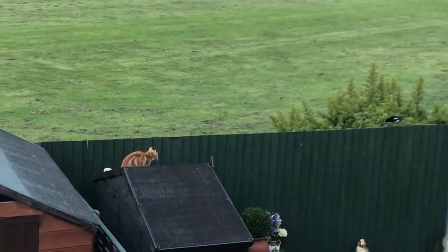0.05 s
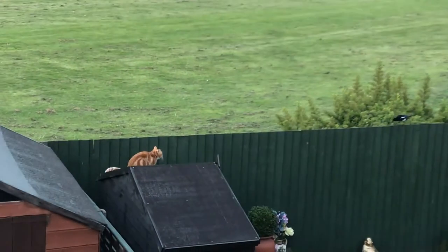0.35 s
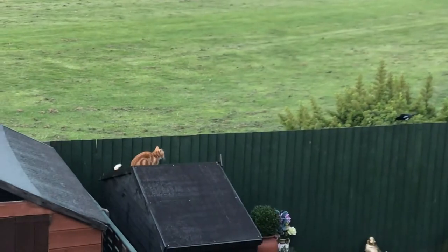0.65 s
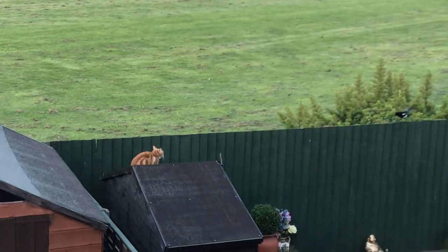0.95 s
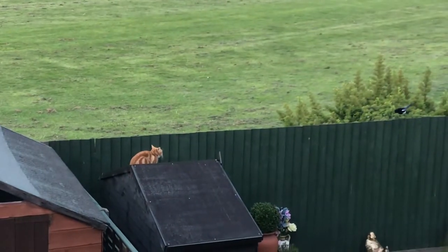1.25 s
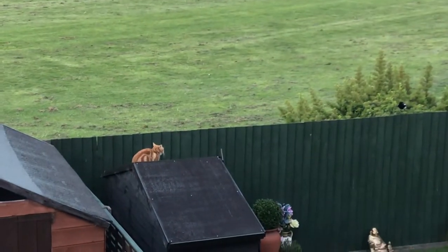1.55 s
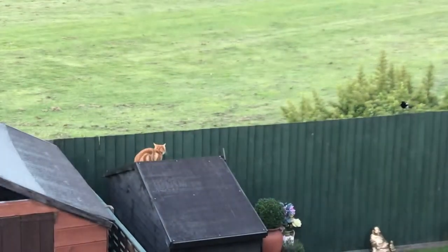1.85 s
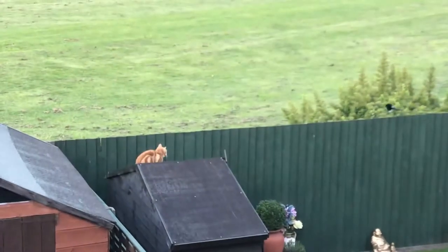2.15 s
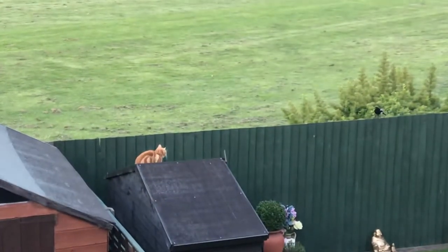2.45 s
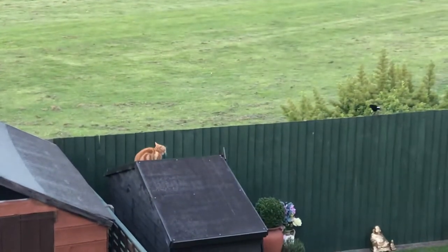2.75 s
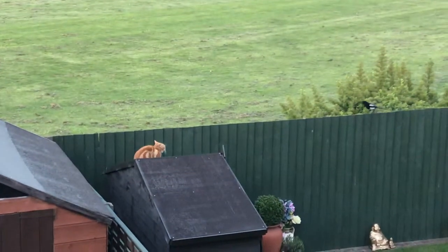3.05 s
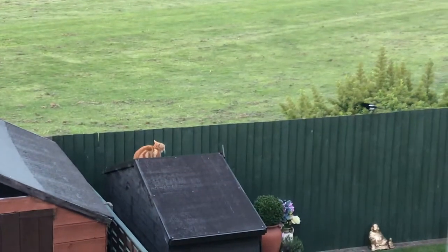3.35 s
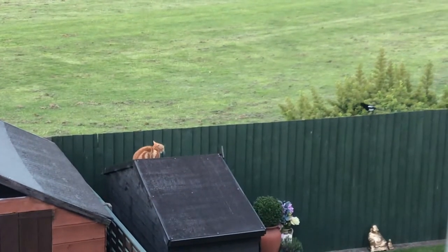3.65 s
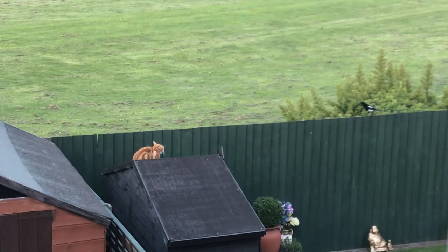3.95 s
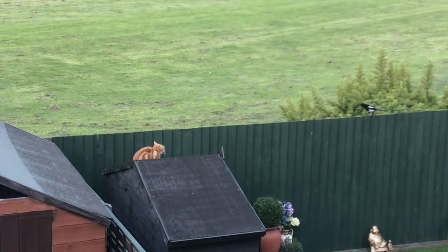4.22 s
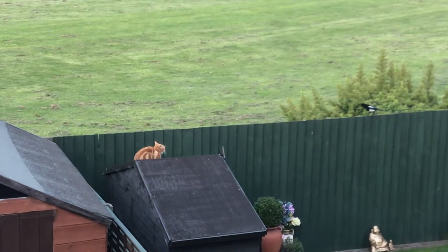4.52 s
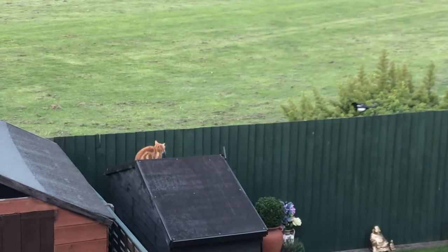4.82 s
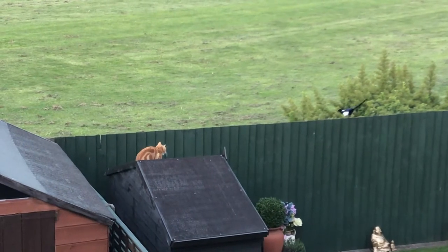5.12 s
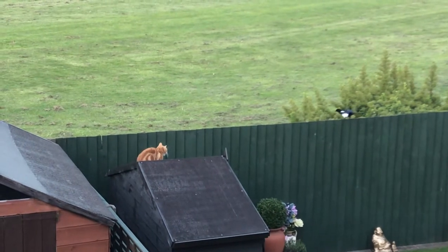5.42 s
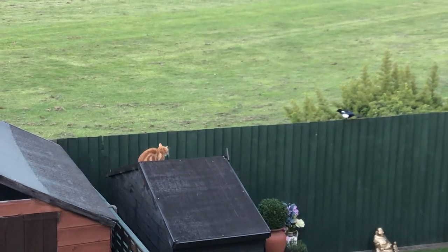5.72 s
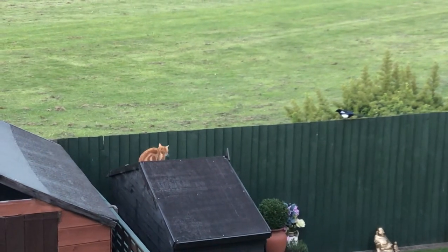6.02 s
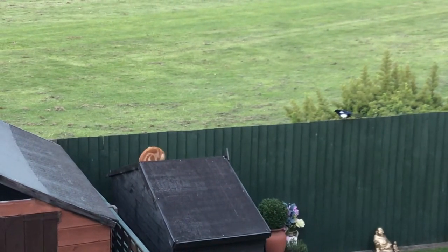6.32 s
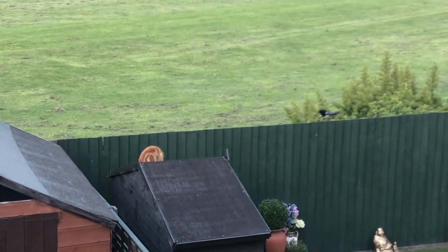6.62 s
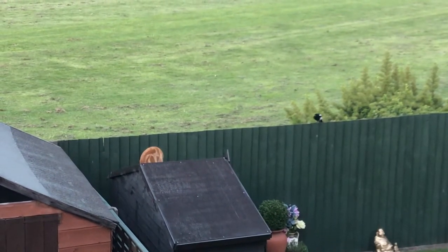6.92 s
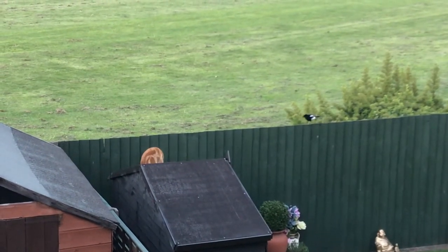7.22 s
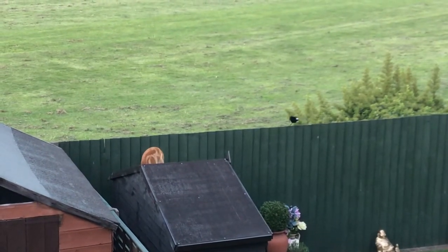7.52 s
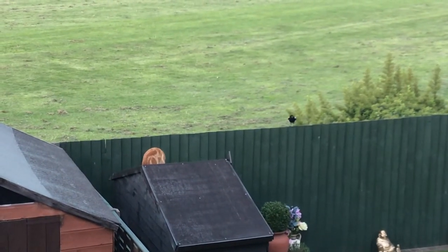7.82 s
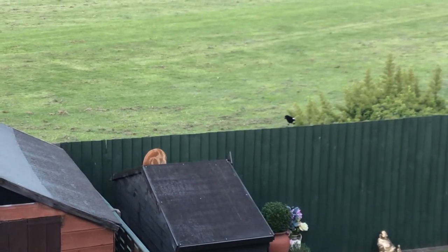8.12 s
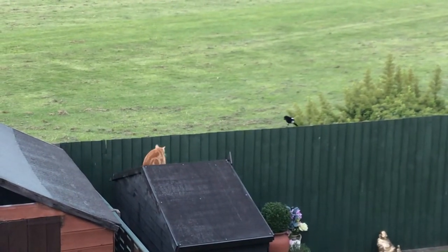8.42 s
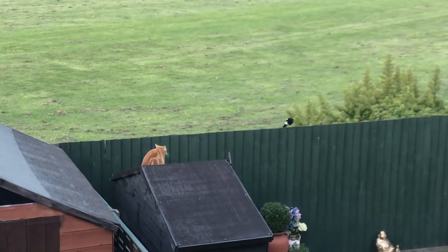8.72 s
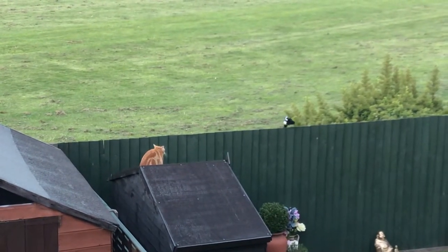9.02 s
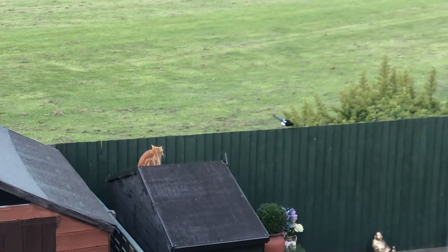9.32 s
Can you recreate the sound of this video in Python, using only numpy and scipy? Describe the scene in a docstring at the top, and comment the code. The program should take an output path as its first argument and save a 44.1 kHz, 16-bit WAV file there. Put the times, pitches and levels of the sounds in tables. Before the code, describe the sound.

A magpie gives two harsh, clacking rattles outdoors, while faint small birds twitter and whistle over a low hum of distant traffic.

```python
'''A magpie scolds a cat

A magpie on a garden fence gives two harsh rattles, heard from an upstairs window. Each clack is
a rasp of uneven pulses through a beak that snaps open; fence, sheds and houses throw it back.
Small birds twitter and a songbird whistles far off, over the hum of traffic where one engine
speeds up. Now and then there is a faint rustle or a soft knock.'''
import sys
import numpy as np
from scipy import signal
from scipy.fft import rfft, irfft, next_fast_len
from scipy.io import wavfile

SR = 44100
rng = np.random.default_rng(int(sys.argv[2]) if len(sys.argv) > 2 else 0)


def wav_out(sig):
    """Save sig, one row per channel (or a flat mono array), as 16-bit PCM at SR to the path in sys.argv[1]."""
    wavfile.write(sys.argv[1], SR, np.round(np.clip(np.atleast_2d(sig).T, -1, 1) * 32767).astype(np.int16))


N = 412794
TIME = np.arange(N) / SR


def amp(db):
    """Turns decibels into a number to multiply by."""
    return 10 ** (np.asarray(db) / 20)


def unit(x):
    """Scales a sound to an average power of 1."""
    return x / np.sqrt(np.mean(x ** 2) + 1e-20)


def read(points, hz):
    """Looks up a value between a table's rows, on a log scale of frequency."""
    row_hz, value = np.transpose(points)
    return np.interp(np.log(hz + 1), np.log(row_hz + 1), value)


def add(mix, start, sound):
    """Mixes a sound in at a start time in seconds."""
    part = mix[max(round(start * SR), 0):][:len(sound)]
    part += sound[:len(part)]


def wander(count, hz):
    """A smooth random drift, mostly slower than hz."""
    size = next_fast_len(count + SR // 8)
    rolloff = 1 + (np.fft.rfftfreq(size, 1 / SR) / hz) ** 4
    return unit(irfft(rfft(rng.standard_normal(size)) / rolloff, size))[:count]


def colour(x, points, size=4096):
    """Shapes a sound's bass and treble to follow a table, with no ringing ahead of the sound."""
    log_gain = np.log(amp(read(points, abs(np.fft.fftfreq(size, 1 / SR)))))
    taps = np.fft.ifft(np.exp(signal.hilbert(log_gain).conj())).real[:size // 2]
    return signal.oaconvolve(x, taps / np.linalg.norm(taps))[:len(x)]


def plateau(t, span, attack, release):
    """A smooth hump that rises at -span, falls at +span and is at most 4 high."""
    return (1 + np.tanh((t + span) / attack)) * (1 + np.tanh((span - t) / release))


def garden(x, linger=1, build_s=0.022, drift_hz=1.3):
    """Houses and shrubs scatter sound into a soft tail whose treble dies first."""
    # Each row: frequency in Hz, seconds to fade by 60 dB when linger is 1.
    fade_times = [(300, 1), (1500, 0.45), (2600, 0.31), (6000, 0.27), (12000, 0.2)]
    hz, t, noise = signal.stft(rng.standard_normal((2, 2 * SR // 3)), SR, nperseg=256)
    decay = amp(-60 * t / (linger * read(fade_times, hz)[:, None]))
    tails = signal.istft(noise * decay * (1 - np.exp(-t / build_s)), SR, nperseg=256)[1]
    angle = 2 * np.pi * drift_hz * TIME  # the paths keep shifting
    shares = np.cos(angle), np.sin(angle)
    return sum(signal.oaconvolve(x * share, tail / np.linalg.norm(tail))[:N]
               for share, tail in zip(shares, tails))


def traffic(wash_db=-57.67, slow_db=0.8, flicker_db=1.0, fade_s=0.04):
    """Far roads and air make a wide wash of noise; vehicles add drones and tyre roar."""
    # The tone of the wash. Each row: frequency in Hz, relative level in dB.
    wash_tone = [(15, -42), (25, -27), (53, 1), (82, -7), (126, -6.5), (156, -7), (274, -10), (331, -17.5),
                 (368, -16), (970, -21.5), (1570, -28), (1850, -30.5), (2170, -31), (4750, -39.5),
                 (15500, -45.5)]
    # Far vehicles. Each row: start and end in seconds, centre and width in Hz, level in dB.
    drones = [(0, 9.36, 54.5, 16, -70.5), (0, 0.28, 250, 67, -66), (4.1, 5.9, 1140, 510, -72),
              (5.15, 5.9, 55.3, 3.7, -60.5), (7.8, 9.36, 218, 43, -63.5), (8.5, 9.7, 295, 62, -67.5),
              (8.5, 11, 88, 24, -65)]
    swell_db = slow_db * wander(N, 2.4) + flicker_db * wander(N, 18.0)
    size = next_fast_len(N)
    hz = np.fft.rfftfreq(size, 1 / SR)
    wash = rfft(rng.standard_normal(size)) * amp(read(wash_tone, hz))
    out = amp(wash_db + swell_db) * unit(irfft(wash, size)[:N])
    for start, end, centre, width, db in drones:
        band = np.exp(-2 * ((hz - centre) / width) ** 2 + 2j * np.pi * rng.random(len(hz)))
        presence = plateau(TIME - (start + end) / 2, (end - start) / 2, fade_s, fade_s) / 4
        out += amp(db) * presence * unit(irfft(band, size)[:N])
    return out


def engine(waver=0.00963, fading_db=2, octave_db=-17):
    """A far engine climbs through two gears; little but its firing tone carries this far."""
    # Each row: start and end in seconds, first firing rate in Hz, climb in Hz a second, level in dB.
    gears = [(3.7, 5.357, 104.1, 45, -59.5), (6.45, 8.04, 111, 18.5, -57.5)]
    out = np.zeros(N)
    for start, end, first_hz, climb, db in gears:
        hz = first_hz + climb * (TIME - start)
        phase = 2 * np.pi * np.cumsum(hz * (1 + waver * wander(N, 12.5))) / SR
        tone = unit(np.sin(phase) + amp(octave_db) * np.sin(2 * phase))
        throttle = plateau(TIME - (start + end) / 2, (end - start) / 2, attack=0.17, release=0.055) / 4
        out += throttle * amp(db + fading_db * wander(N, 6.8)) * tone
    return out


def rustles():
    """Faint dry rustles and ticks: short bursts of crackly noise."""
    # Each row: start and length in seconds, level in dB.
    scuffs = [(4.74, 0.04, -70), (4.827, 0.027, -70), (4.88, .014, -68), (5.015, .043, -66.5),
              (5.428, 0.0097, -68), (5.605, 0.016, -68), (6.531, 0.04, -67), (7.25, 0.011, -67.5)]
    # Their tone. Each row: frequency in Hz, relative level in dB.
    scuff_tone = [(1000, -8), (3500, -4), (6500, -7), (10000, -15), (16000, -23)]
    out = np.zeros(N)
    for start, length, db in scuffs:
        count = int(length * SR)
        grains = rng.standard_normal(count) * np.exp(0.36 * wander(count, 250))
        add(out, start, amp(db) * unit(grains * signal.windows.tukey(count, .5)))
    return colour(out, scuff_tone)


def knocks(wobble_hz=65, decay_s=.018):
    """Soft, quick knocks, each followed by a short low wobble."""
    # Each row: time in seconds, pitch in Hz, half length in seconds, knock and wobble gains in dB.
    bumps = [(1.482, 1700, 0.00022, -47.5, -65.5), (2.659, 400, 0.00098, -29, -43)]
    out = np.zeros(N)
    t = np.arange(-SR // 20, SR // 10) / SR
    after = np.maximum(t, 0)
    wobble = np.exp(-after / decay_s) * np.sin(2 * np.pi * wobble_hz * after)
    for when, hz, width, db, wobble_db in bumps:
        knock = np.exp(-(t / width) ** 2) * np.sin(2 * np.pi * hz * t)
        add(out, when + t[0], amp(db) * knock + amp(wobble_db) * wobble)
    return out


def note(hz, flutter, flutter_hz, shimmer, burr, taper=0.44):
    """A bird's note: flutter shakes its pitch, shimmer its loudness, and burr makes it husky."""
    count = len(hz)
    turns = np.cumsum(hz * (1 + flutter * wander(count, flutter_hz))) / SR
    swell = signal.windows.tukey(count, taper) * np.exp(shimmer * wander(count, 49))
    grain = 1 + burr * wander(count, 420)
    return unit(swell * grain * np.sin(2 * np.pi * turns))


def chirp(length, start_hz, end_hz, bend=1.8):
    """A quick slide that moves fast at first and settles on its last pitch."""
    hz = end_hz + (start_hz - end_hz) * np.linspace(1, 0, int(length * SR)) ** bend
    return note(hz, flutter=0.026, flutter_hz=200, shimmer=0.48, burr=0.28)


def twitter(gain_db=0.6, echo_db=-4.5, faint_s=0.047, spread=.15, slide=0.082, per_bout=5):
    """Small birds chirp and hold husky notes, blurred by distance."""
    # Each row: start and length in seconds, first and last pitch in Hz, relative level in dB.
    chirps = [(0.378, 0.075, 5950, 6250, -71.5), (0.423, 0.042, 5730, 3200, -66),
              (0.55, 0.048, 7200, 5230, -74), (0.563, .052, 5830, 3780, -66.5),
              (.688, 0.029, 3830, 4080, -61.5), (.74, .06, 3690, 4460, -70), (0.793, 0.04, 4160, 3430, -60),
              (0.798, .034, 5300, 4830, -73), (0.892, 0.024, 3810, 4020, -61.5),
              (1.023, 0.038, 3600, 3880, -64), (1.038, 0.03, 3150, 3220, -67),
              (1.066, 0.036, 3750, 4010, -60.5), (1.237, .036, 3990, 4100, -68.5),
              (4.925, 0.026, 4900, 4430, -73), (4.993, 0.029, 3980, 3120, -69),
              (5.087, 0.03, 3650, 3200, -66), (5.14, 0.042, 3710, 2920, -67.5),
              (5.204, .046, 3660, 2840, -63), (6.128, 0.034, 3780, 3770, -72),
              (6.199, 0.022, 3790, 3820, -72), (6.235, 0.03, 4010, 3840, -67),
              (6.29, 0.019, 3960, 3700, -71)]
    # Spells of faint random chirps.
    # Each row: start and end in seconds, middle pitch in Hz, relative level in dB.
    bouts = [(0.703, 1.302, 4460, -75), (4.305, 5.502, 3740, -79), (6.203, 6.95, 3600, -80)]
    # Each row: start and length in seconds, pitch in Hz, flutter as a share of it, relative level in dB.
    husky_notes = [(0, 0.13, 3697, .009, -66), (0.015, 0.16, 3430, .008, -72.5),
                   (0.205, .084, 3640, .02, -73), (1.13, .066, 3450, .006, -72),
                   (1.37, 0.055, 2680, 0.016, -75.5), (1.646, 0.1, 3150, 0.017, -79),
                   (4.34, .062, 3790, .07, -78), (4.657, .074, 3240, .03, -75.5),
                   (5.247, 0.29, 3020, .028, -74), (5.257, 0.21, 7360, 0.047, -78),
                   (5.468, 0.28, 2960, .03, -77)]
    out = np.zeros(N)
    for start, length, start_hz, end_hz, db in chirps:
        add(out, start, amp(db) * chirp(length, start_hz, end_hz))
    for start, end, hz, db in bouts:
        for when, pitch, slope in rng.random((per_bout, 3)):
            start_hz = hz * (1 + spread * (2 * pitch - 1))
            end_hz = start_hz * (1 + slide * (2 * slope - 1))
            add(out, start + when * (end - start), amp(db) * chirp(faint_s, start_hz, end_hz))
    for start, length, hz, flutter, db in husky_notes:
        held_hz = np.full(int(length * SR), hz)
        add(out, start, amp(db) * note(held_hz, flutter, flutter_hz=200, shimmer=0.18, burr=.35))
    return amp(gain_db) * (out + amp(echo_db) * garden(out, linger=1.6))


def trill(sweep_hz=130, db=-68):
    """A run of tiny pips, each sliding down, on a slowly rising pitch."""
    # In order: start and length in seconds, first and last pitch in Hz, pips a second.
    pip_run = (6.412, .1, 3000, 3180, 57)
    start, length, start_hz, end_hz, rate = pip_run
    t = np.arange(int(length * SR)) / SR
    cycle = (rate * t) % 1
    hz = start_hz + (end_hz - start_hz) * t / length + sweep_hz * (1 - 2 * cycle)
    pips = np.sin(np.pi * cycle) ** 2 * np.sin(2 * np.pi * np.cumsum(hz) / SR)
    out = np.zeros(N)
    add(out, start, amp(db) * unit(pips))
    return out


def whistler(gain_db=0.5, echo_db=-16, droop=0.068):
    """A far songbird sings a trill, low warbles that droop at the end, and pure whistles."""
    # Each row: start and length in seconds, pitch in Hz, relative level in dB.
    warbles = [(0.912, .13, 2090, -77.5), (1.123, .12, 2100, -76.5), (4.473, 0.37, 2090, -75),
               (4.873, 0.29, 2340, -76.5), (5.683, 0.26, 2030, -68.5), (6.127, 0.17, 1930, -67.5)]
    # Each row is one whistle. Each point in it: time in seconds, pitch in Hz, relative level in dB.
    whistles = [
        [(5.18, 3080, -73), (5.24, 1980, -70)],
        [(5.265, 2740, -69), (5.311, 1900, -70)],
        [(5.29, 2890, -72), (5.46, 2920, -67)],
        [(5.93, 2004, -69), (5.97, 1840, -73), (6.01, 2365, -57.5), (6.035, 2435, -59.5), (6.078, 2445, -59),
         (6.1, 2364, -70)],
        [(6.925, 2250, -75), (6.969, 2450, -67)],
        [(6.955, 2970, -65), (7.05, 2900, -78), (7.09, 2660, -80), (7.2, 2530, -74), (7.28, 2400, -90)],
        [(7.32, 2480, -66), (7.36, 2160, -69), (7.39, 2030, -80), (7.44, 2300, -67), (7.485, 2350, -73)],
        [(8.68, 2270, -66), (8.79, 2140, -68)],
        [(8.86, 1815, -65), (8.96, 1957, -70), (8.985, 2100, -74), (9.05, 2230, -59.5), (9.083, 2370, -75),
         (9.115, 2440, -62), (9.175, 2940, -60)],
    ]
    out = trill()
    for start, length, hz, db in warbles:
        sag = np.linspace(0, 1, int(length * SR)) ** 2
        drooping_hz = hz * (1 - droop * (sag - sag.mean()))
        tone = note(drooping_hz, flutter=0.028, flutter_hz=70, shimmer=0.27, burr=0.23)
        add(out, start, amp(db) * tone)
    for points in whistles:
        times, hz, db = np.transpose(points)
        t = np.arange(times[0], times[-1], 1 / SR)
        tone = note(np.interp(t, times, hz), flutter=.003, flutter_hz=60, shimmer=.18, burr=.06, taper=.2)
        add(out, times[0], amp(np.interp(t, times, db)) * tone)
    return amp(gain_db) * (out + amp(echo_db) * garden(out, linger=2.5))


def reflections(x, fence_db=-7):
    """Adds sharp echoes from fence, ground, sheds and walls, keeping the overall level."""
    # The fence echo comes later as the bird hops along. Each row: time and delay, both in seconds.
    fence_delays = [(2.3, .00365), (3.9, .00365), (7.5, .00379), (8.7, .00379)]
    # Ground, sheds and walls. Each row: delay in seconds, level in dB against the direct sound.
    echoes = [(.0013, -25), (.0057, -27), (.0082, -11), (0.013, -12), (.021, -23.5), (.034, -26.5),
              (.047, -29)]
    lag = np.round(np.interp(TIME, *np.transpose(fence_delays)) * SR).astype(int)
    out = x + amp(fence_db) * x[np.maximum(np.arange(N) - lag, 0)]
    for delay, db in echoes:
        add(out, delay, amp(db) * x)
    return out * x.std() / out.std()


def rasp(count, pulse_hz=265, spread=.14, jitter=.25, slap_db=-13.5, shudder=0.087):
    """The bird's voice box slaps at an uneven rate; each slap lets out a puff of rushing air."""
    hz = pulse_hz * np.exp(spread * rng.standard_normal() + jitter * wander(count, 200))
    turns = np.cumsum(hz) / SR + rng.random()
    slaps = np.diff(np.floor(turns), prepend=np.floor(turns[0]))  # one click a turn
    puffs = np.exp(-(turns % 1)) * rng.standard_normal(count)
    pressure = np.exp(shudder * wander(count, 110))
    return pressure * (amp(slap_db) * unit(slaps) + unit(puffs))


def magpie(low_db=-1.5, high_db=3.0, clack_s=0.031, pace_s=0.08, split_hz=3850, beam_hz=6800):
    """Each clack is a rasp that swells and stops; the treble gets out only while the beak is widest."""
    # Each row: middle of a clack in seconds, effort in dB.
    clacks = [(2.362, -42.5), (2.428, -36), (2.5, -35.5), (2.582, -36), (2.668, -35.5), (2.756, -36),
              (2.847, -36), (2.942, -35.5), (3.036, -37.5), (3.14, -36.5), (3.251, -36.5), (3.378, -35.5),
              (3.487, -35.5), (3.576, -35), (3.67, -34), (3.764, -35.5), (7.546, -44), (7.609, -37),
              (7.682, -36.5), (7.764, -36), (7.849, -36), (7.94, -36), (8.029, -36), (8.127, -36),
              (8.228, -36), (8.323, -36.5), (8.415, -36.5), (8.51, -36), (8.606, -35)]
    # The head turns away during the first rattle and faces the house for the second.
    # Each row: time in seconds, treble change in dB at beam_hz.
    facing = [(2.36, -4.5), (2.48, -2.5), (2.78, -3.5), (3.1, -7.5), (3.6, -7), (3.77, -12), (7.55, -2.5),
              (7.7, -1.1), (8.5, -2.4)]
    # The tone of throat and beak. Each row: frequency in Hz, relative level in dB.
    throat = [(300, -31.5), (700, -22), (1150, -15.5), (1400, -12), (1650, -4), (1900, -5.5), (2600, 2.5),
              (3250, -6.5), (3600, -12), (4500, -12), (5800, -3), (7200, -14), (9000, -13.5),
              (10400, -23.5), (11900, -16), (13600, -26), (15500, -24)]
    low, high = np.zeros(N), np.zeros(N)
    t = np.arange(-SR // 20, SR // 20) / SR
    hz = np.fft.rfftfreq(len(t), 1 / SR)
    times = np.transpose(clacks)[0]
    for middle, effort_db in clacks:
        spacing = np.sort(abs(times - middle))[1]  # to the nearest other clack
        length = clack_s * (spacing / pace_s) ** 0.41  # a slower rattle draws each clack out
        voice = rasp(len(t))
        push = plateau(t + 0.0021, 0.73 * length, attack=.0035, release=.007)
        opening = plateau(t + 0.0038, 0.47 * length, attack=0.0085, release=0.0031)
        add(low, middle + t[0], amp(effort_db + low_db) * unit(voice * push))
        # The beak aims the treble: as the head turns away, the highest part is lost first.
        turn_db = np.interp(middle, *np.transpose(facing)) * hz / beam_hz
        beamed = irfft(rfft(unit(voice * opening)) * amp(turn_db), len(t))
        add(high, middle + t[0], amp(effort_db + high_db) * beamed)
    keep_low = signal.butter(2, split_hz, fs=SR, output="sos")
    keep_high = signal.butter(2, split_hz, "high", fs=SR, output="sos")
    chest = signal.sosfilt(np.tile(keep_low, (2, 1)), low)  # each filter runs twice
    beak = signal.sosfilt(np.tile(keep_high, (2, 1)), high)
    return colour(chest + beak, throat)


def scene(echo_db=-13):
    """The nearby magpie and its echoes over the quiet background, in one channel."""
    call = magpie()
    near = reflections(call) + amp(echo_db) * garden(call)
    return (near + twitter() + whistler() + rustles() + engine() + traffic() + knocks())[None]


def record(dry, edge_hz=15950):
    """Cuts off the very highest treble."""
    taps = signal.firwin(511, edge_hz, window=("kaiser", 9), fs=SR)
    return signal.oaconvolve(dry, taps[None], "same")


dry = scene()
out = record(dry)
wav_out(out)
```